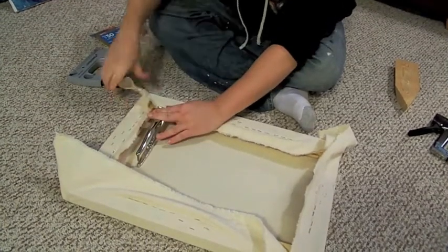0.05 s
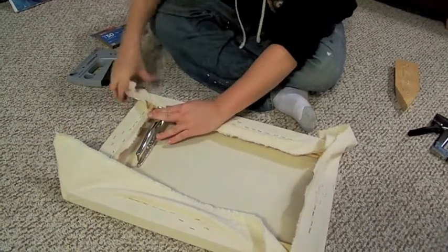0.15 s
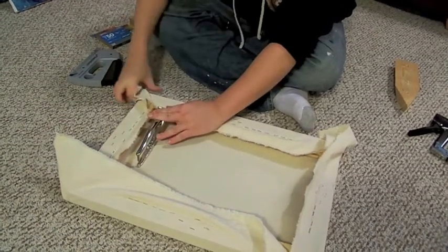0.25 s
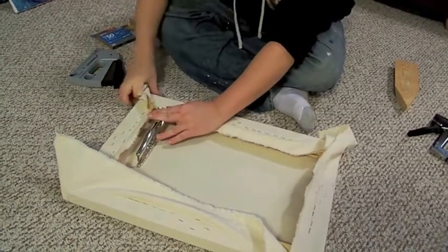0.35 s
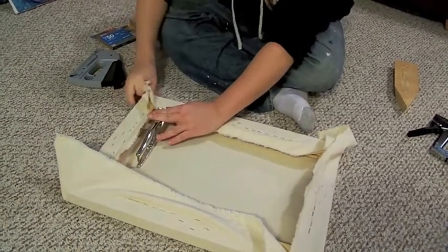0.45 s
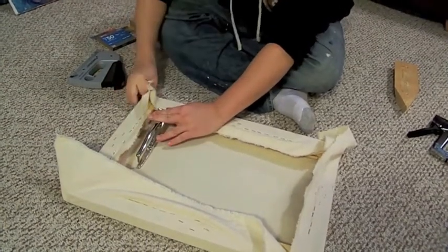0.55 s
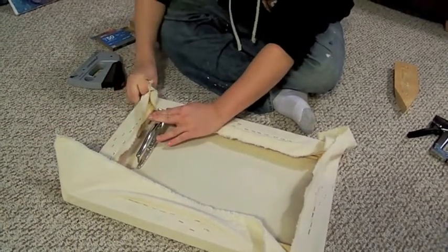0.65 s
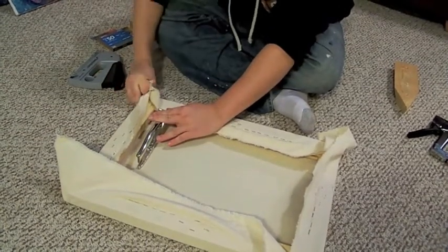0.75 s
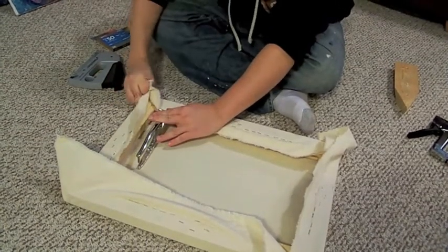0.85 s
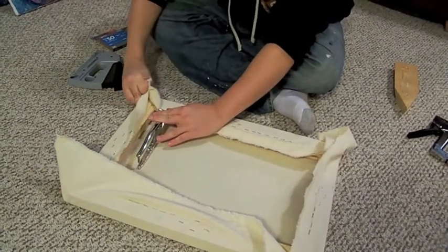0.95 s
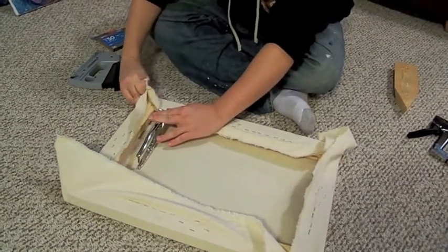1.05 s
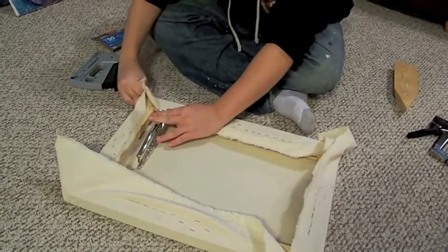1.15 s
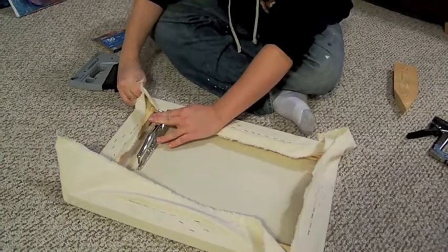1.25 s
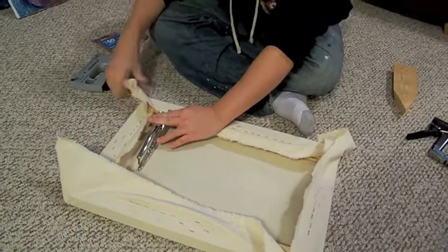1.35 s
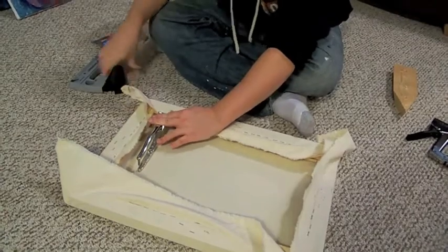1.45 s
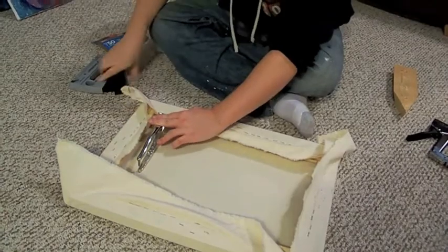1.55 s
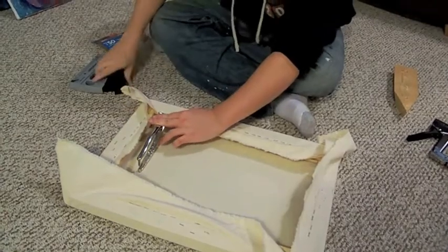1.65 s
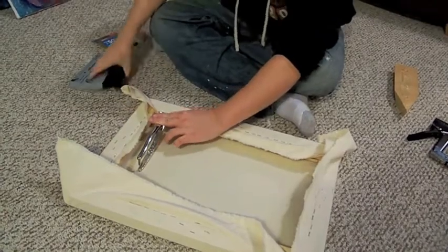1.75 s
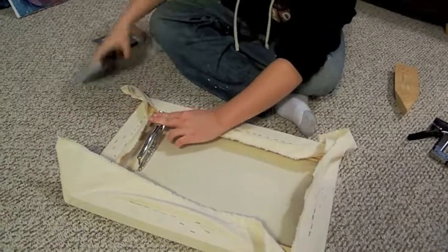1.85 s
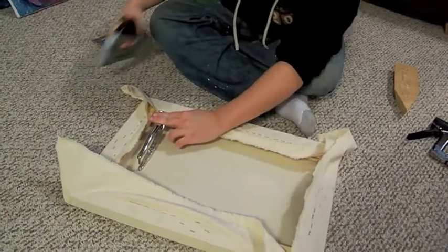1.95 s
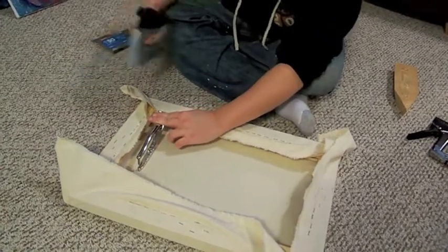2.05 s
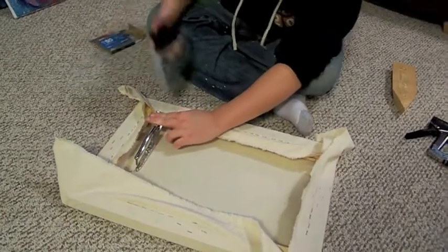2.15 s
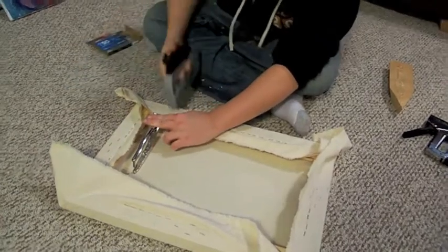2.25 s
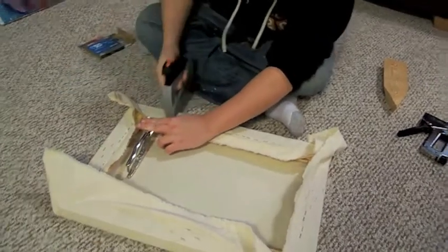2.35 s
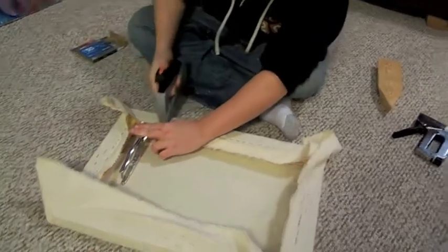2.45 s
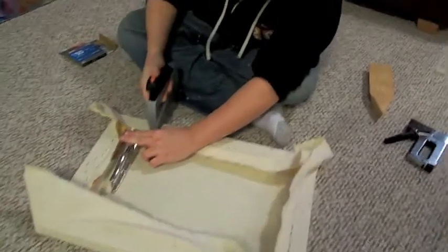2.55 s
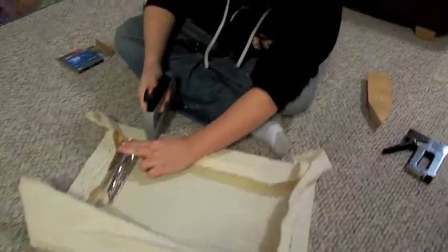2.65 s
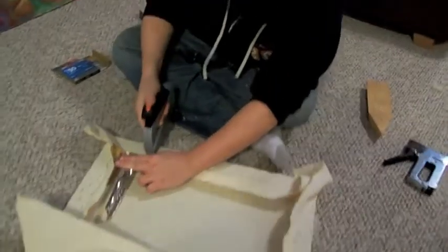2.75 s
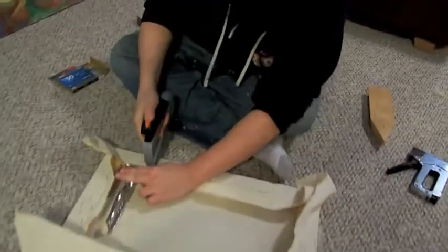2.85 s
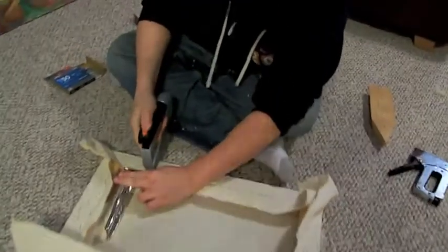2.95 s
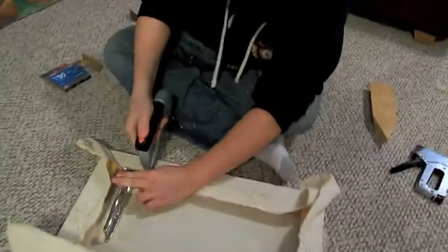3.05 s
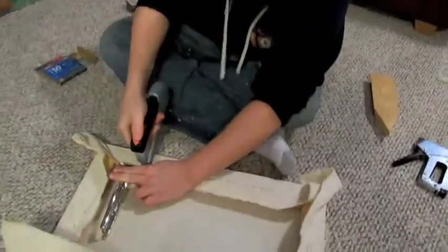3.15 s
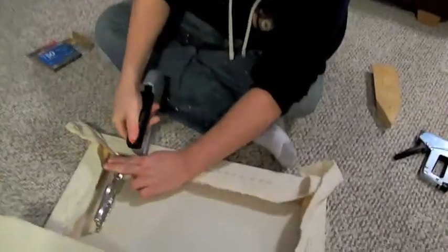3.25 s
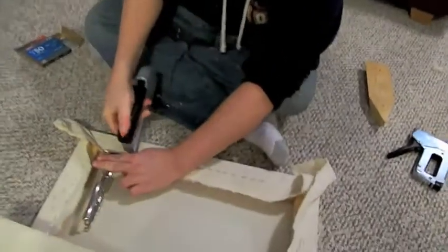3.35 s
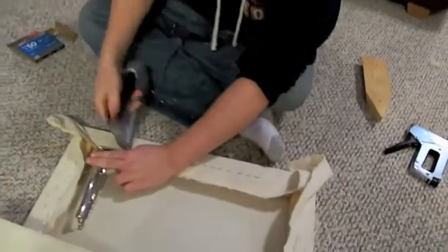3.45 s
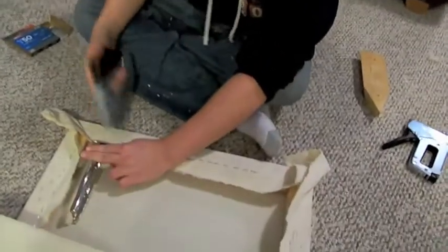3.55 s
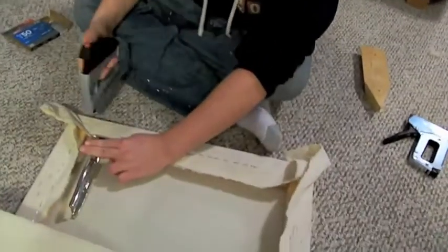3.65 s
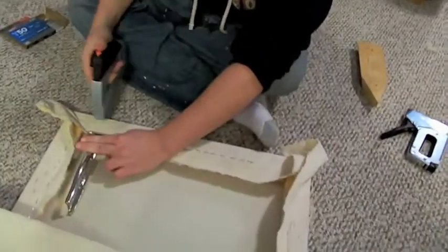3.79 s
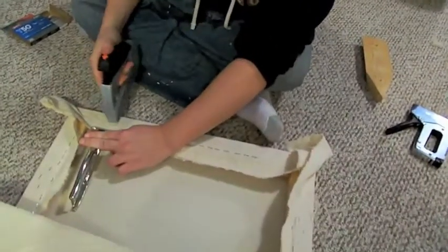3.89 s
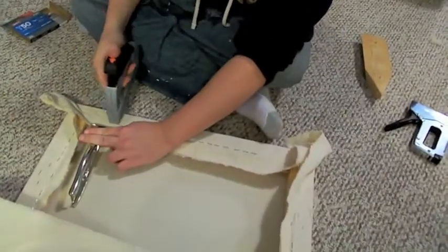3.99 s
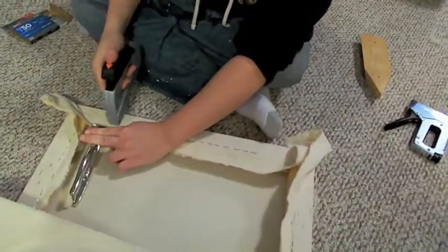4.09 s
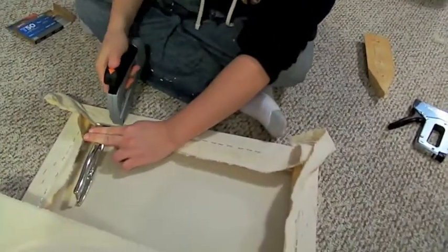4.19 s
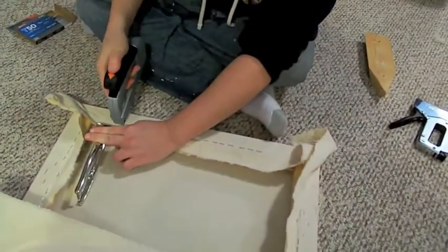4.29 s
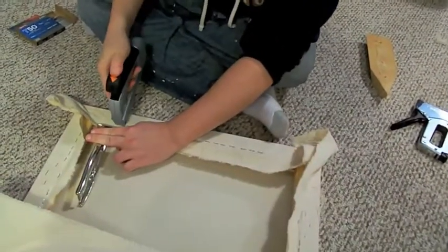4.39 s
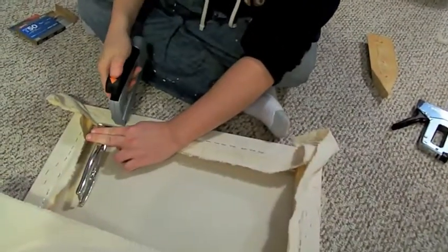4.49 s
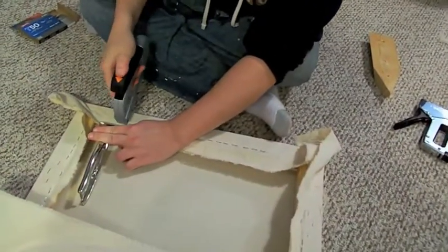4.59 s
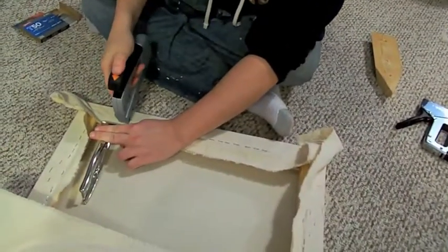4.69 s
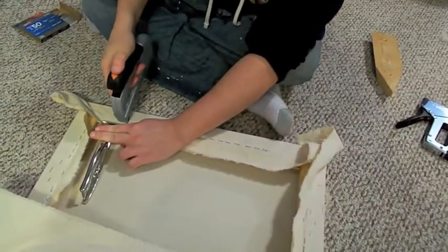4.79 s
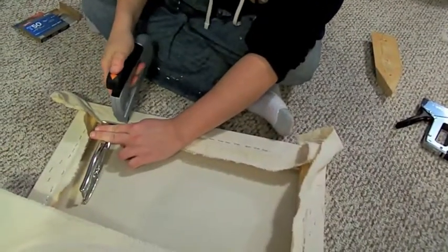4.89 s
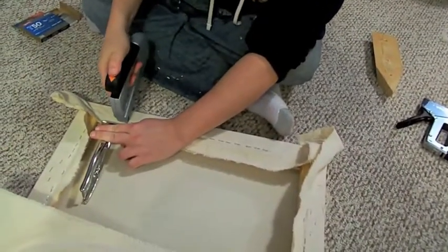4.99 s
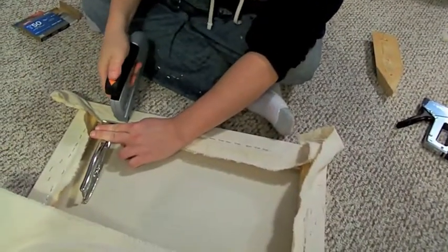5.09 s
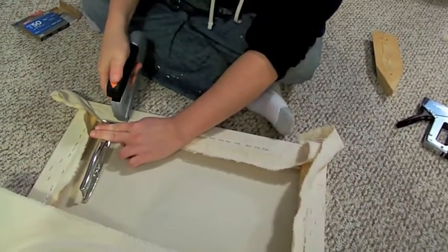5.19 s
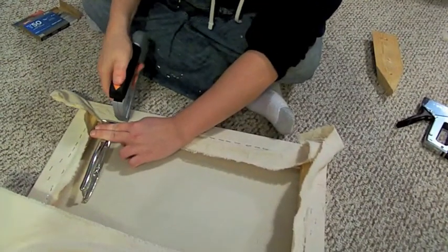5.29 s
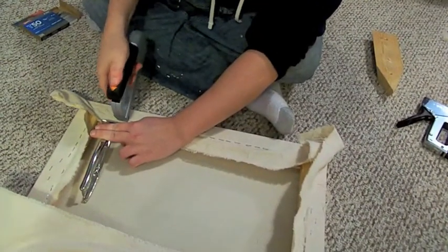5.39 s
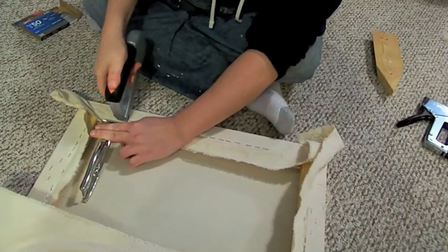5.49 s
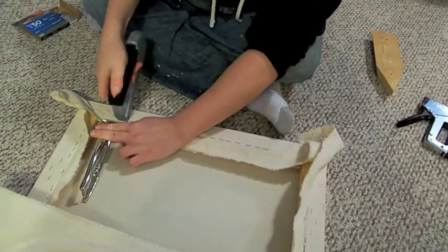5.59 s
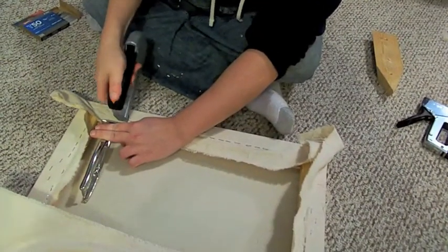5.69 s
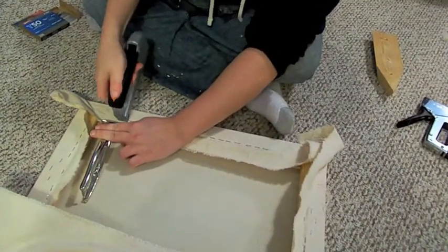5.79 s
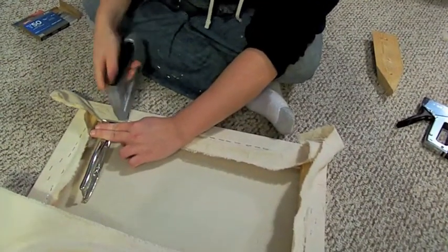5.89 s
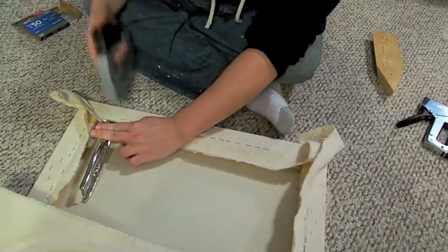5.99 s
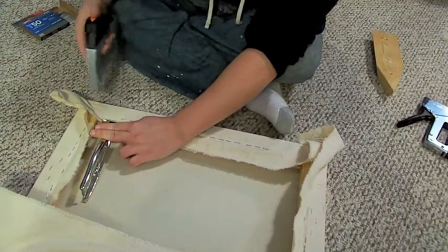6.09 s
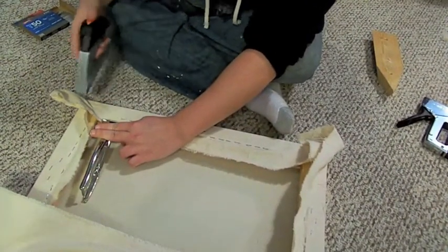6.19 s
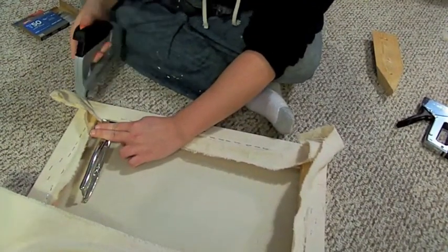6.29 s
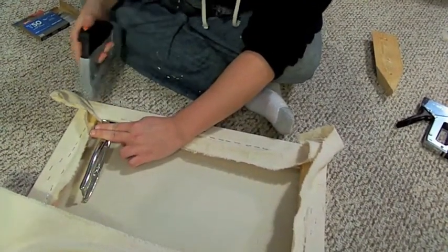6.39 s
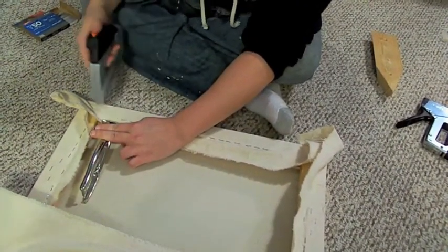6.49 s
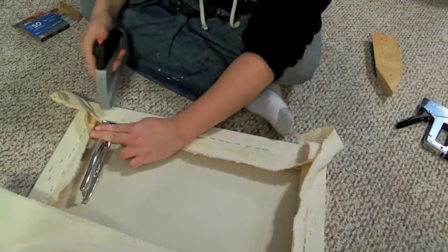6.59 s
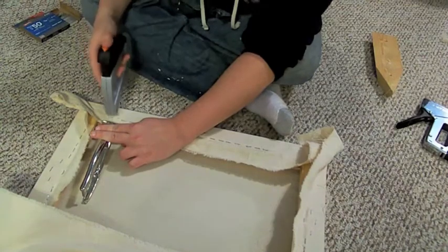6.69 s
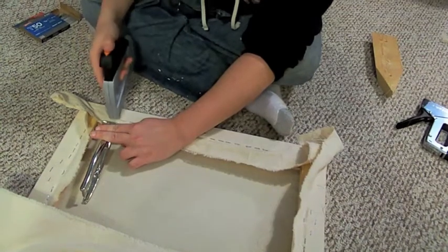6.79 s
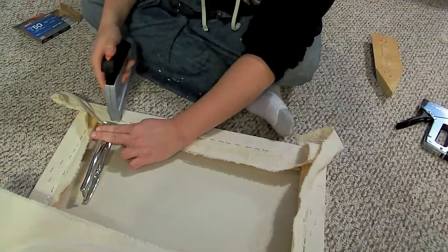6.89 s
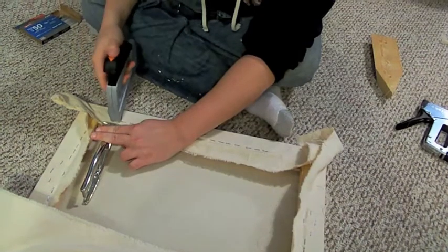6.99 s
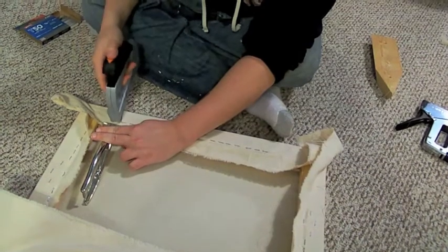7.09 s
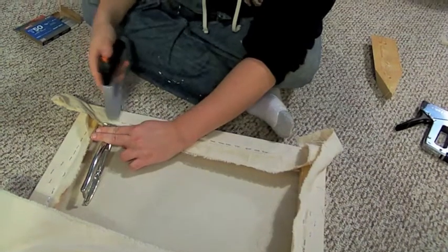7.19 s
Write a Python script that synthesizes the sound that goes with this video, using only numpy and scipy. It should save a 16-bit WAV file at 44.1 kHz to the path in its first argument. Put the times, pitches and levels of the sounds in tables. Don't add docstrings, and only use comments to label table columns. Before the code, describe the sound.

A hand staple gun works on a canvas-covered wooden frame, heard near a camera microphone. Quiet fabric movement and tiny metal ticks come first, then a bump of the gun, a hard dry snap and a rattling, briefly singing handle return. Low floor movement follows, then a light tap, another snap and clatter. Gain drops abruptly at each shot and creeps back; dull knocks end it.

```python
import sys
import numpy as np
from scipy import signal
from scipy.fft import rfft, irfft
from scipy.io import wavfile
from scipy.ndimage import uniform_filter1d

SR = 44100
rng = np.random.default_rng(int(sys.argv[2]) if len(sys.argv) > 2 else 0)


def voltage_ratio(level):
    return 10 ** (np.asarray(level, float) / 20)


def unload_wav(signal):
    wavfile.write(
        sys.argv[1],
        SR,
        np.round(np.clip(np.atleast_2d(signal).T, -1, 1) * 32767).astype(np.int16),
    )


N = 319328
T = np.arange(N) / SR

# (time [s], peak [dB], ring [Hz], deepest gain [dB], recovery [s])
SHOTS = [
    (3.2931, 2, 6000, -42, 0.21),
    (5.703, 0.2, 3207, -38.5, 0.2),
]
# (time [s], peak [dB], ring [Hz], left minus right [dB])
STAPLE_CLICKS = [(0.1716, -28, 4860, 0), (1.509, -38, 5000, 6), (1.5148, -29.5, 5360, -2.1),
                 (1.5335, -30, 5360, 4), (1.5514, -35.5, 2310, 2), (1.6073, -46, 3480, 4),
                 (1.8499, -28.5, 2270, 2), (1.8648, -38, 2160, 6), (2.134, -41, 5000, 3),
                 (2.8905, -22, 3790, 4.5), (3.1164, -22, 2900, 2.5), (3.119, -26.5, 4983, 4),
                 (3.3125, -22.5, 5900, 3), (3.483, -19.5, 6370, 1.6), (3.6449, -22.5, 4750, 0.6),
                 (4.0963, -45, 3360, 2), (5.7215, -18.5, 2750, 2.5), (5.7415, -28.5, 2750, 7),
                 (6.079, -30, 2022, 1)]
# (time [s], peak [dB], ring [Hz], left minus right [dB])
BUMPS = [(2.0143, -44, 2250, 2.1), (2.1054, -15.5, 3280, 5), (2.1278, -33, 2630, 4),
         (2.1625, -34.5, 2980, 3), (3.0734, -38, 4950, 5), (3.684, -30, 2410, -1.1),
         (5.477, -42, 2784, 2.5), (5.5379, -35, 4910, -1.5), (5.5706, -15, 3023, 2), (5.9107, -26, 3400, 7),
         (6.9273, -40.5, 2700, 0)]
# (time [s], peak [dB], ring [Hz], chatter [ms], left minus right [dB])
LATCH_AND_HANDLE = [(3.2856, -4, 2930, 2.45, 2.5), (3.5196, -6.5, 1930, .7, -1),
                    (3.5208, -0.4, 5810, 1.8, 1.3), (3.537, -11, 2640, 2.5, -3.5),
                    (3.542, -8, 5100, 4.4, -3), (3.547, -5.5, 2700, 1.1, 0), (3.5495, -7, 2400, 1.8, 2),
                    (5.698, -4, 2706, 1.6, 5.5), (5.9452, -10, 1995, .6, -5.5), (5.947, 0, 6700, 2, 9),
                    (5.962, -7.5, 5800, 1.6, -2.5), (5.970, -6.5, 3140, 2.9, 7), (5.976, -5, 4874, 1.8, 3),
                    (5.982, -14, 2130, 1.4, -3)]
# (time [s], peak [dB], low tone [Hz], high tone [Hz], high tone level [dB])
SINGING_TAPS = [(.171, -41.5, 1456, 2770, -1.1), (1.51, -31, 1500, 2250, -16), (1.535, -38, 2220, 3460, 2),
                (1.576, -52, 1490, 2300, 8), (1.594, -54, 1510, 2300, 8), (1.608, -48, 2310, 3450, 0),
                (1.866, -42, 1410, 2170, 11), (5.999, -22.5, 1545, 2200, 6), (6.038, -35, 1506, 2200, 2.5),
                (1.851, -30.5, 1384, 2210, 4), (2.014, -44.5, 1420, 2200, 6), (2.134, -36, 1420, 2250, 5.5),
                (3.55, -20, 1508, 2070, 6), (5.475, -42, 1510, 2750, 8.5), (5.974, -18, 1548, 2060, 8),
                (3.644, -32.5, 1480, 2200, 1.5), (5.57, -31, 1518, 2200, 1), (6.927, -43, 1465, 2674, 6.5)]
# (tone [Hz], width [Hz], level [dB])
CASING = [(1420, 330, -12.5), (2750, 1200, -11.5), (4300, 900, -14), (5460, 1200, -21.5)]
# (time [s], peak [dB], tone [Hz], fall by 60 dB [s], chatter [ms])
FRAME_KNOCKS = [(2.105, -17, 1190, 0.0056, 3.3), (2.105, -28.5, 241, 0.028, 7.4),
                (2.95, -46.5, 520, 0.013, 120), (3.2923, -27.5, 106, .04, 7.1), (3.293, -21, 520, 0.03, 4),
                (4.001, -44.5, 155, 0.048, 6.5), (5.7054, -31, 109.4, 0.02, 2.5),
                (3.117, -37.5, 700, .012, 2.5), (5.7055, -38.5, 54.8, .05, 2.6), (5.703, -22, 443, .02, 4),
                (5.898, -36, 259, 0.052, 21.5), (6.39, -45, 219.6, 0.048, 12), (6.933, -37, 110, 0.02, 6.3),
                (7.106, -46, 672, .02, 3.4), (7.113, -32.5, 500, 0.025, 5), (7.129, -43, 564, 0.025, 61),
                (7.21, -50, 583, 0.023, 9.7)]
# (tone [Hz], width [Hz])
BOARDS = [(38, 22), (78, 31)]
SHIVER_DB = [-58.5, -68.5]
# (time [s], peak [dB], tone [Hz], fall by 60 dB [s])
WEIGHT_SHIFTS = [(0.018, -50, 34, .8), (1.899, -52, 44.4, .5), (2.09, -39, 37.87, 1.1),
                 (2.1, -58, 78, 0.55), (3.13, -52.5, 80, .4), (3.668, -39, 76.4, 0.38),
                 (3.812, -47, 81.6, 0.41), (3.971, -52, 62.5, .4), (4.29, -34.5, 79.9, 0.35),
                 (4.31, -39, 41.55, 2.2), (4.44, -49.5, 74.1, 1.8), (4.78, -33.5, 21.57, 0.86),
                 (4.791, -39, 60.9, 0.79), (5.26, -49, 78.5, 0.99), (5.4, -47.5, 75, .5),
                 (5.861, -46.5, 71.8, 0.43), (5.92, -43, 39.95, 1.8), (6.049, -49.5, 71.6, 0.98),
                 (6.359, -41.5, 79.8, 0.47), (6.419, -50, 39.2, 0.82), (6.5, -54, 71, 0.52),
                 (6.721, -43.5, 34.5, 0.53), (6.919, -45.5, 69.5, .6), (6.95, -50, 35.1, 0.68),
                 (7.08, -42, 23.14, .9)]
# (loudest time [s], level [dB], swell [s], fade [s])
RUSTLES = [(.46, -57.5, 0.24, 0.2), (1.04, -58.5, 0.15, .08), (1.28, -56, 0.048, 0.11),
           (1.46, -69, 0.12, .1), (1.62, -55, 0.092, 0.075), (1.77, -56, 0.057, 0.22),
           (2.7, -65, 0.68, 0.58), (2.96, -62.5, .08, 0.079), (3.05, -61, 0.056, 0.053),
           (3.2, -55.5, 0.056, 0.07), (4.09, -62, .15, .1), (4.8, -60.5, .15, .25), (1.6, -65, 3.1, 4.1)]
# (frequency [Hz], level per Hz [dB])
CLOTH_COLOUR = [(500, -22), (1200, 2), (2500, 3.5), (4500, 2), (7000, -3)]
# (frequency [Hz], level per Hz [dB])
HUM_COLOUR = [(20, -3.5), (40, 4), (70, -1), (150, 1), (500, -4.5), (2500, -13.5), (5000, -16),
              (7500, -20.5)]
# (delay [ms], level [dB], smear [ms])
WALL_ECHOES = [(17.87, -10.5, 1), (26.8, -18, 4), (33.2, -31.5, 5)]
# (band [Hz], level [dB], fall by 60 dB [s])
ROOM_BANDS = [(143, -33, 0.46), (500, -35, .3), (1200, -25.5, 0.25), (2640, -22, 0.34), (4400, -24, 0.076),
              (7100, -25.5, 0.48)]
# (frequency [Hz], width [Hz], depth [0-1])
HOUSING_DIPS = [(297.5, 150, 0.89), (951, 50, 0.9)]

SQUEEZE_DB = -22


def unit(x):
    return x / np.sqrt(np.mean(x ** 2))


def crest(x, db):
    return voltage_ratio(db) * x / abs(x[:2].mean(0)).max()


def peak(x, hz, width):
    return signal.lfilter(*signal.iirpeak(hz, hz / width, SR), x)


def coloured(shape, points):
    hz, db = np.transpose(points)
    f = np.maximum(np.arange(shape[-1] // 2 + 1) * SR / shape[-1], 1)
    slope = voltage_ratio(np.interp(np.log(f), np.log(hz), db)) * (f > 15)
    return unit(irfft(rfft(rng.standard_normal(shape)) * slope, shape[-1]))


def pair(x, apart):
    return (x[0] + apart * x[1] * np.array([[1], [-1]])) / np.sqrt(1 + apart ** 2)


def walk(rate):
    hold = int(SR / rate)
    steps = np.repeat(rng.standard_normal(N // hold + 1), hold)
    return 1.6 * uniform_filter1d(steps, hold)[:N]


def facets(envelope, apart):
    noise = rng.standard_normal((4, len(envelope)))
    return np.vstack([pair(noise[:2], apart), noise[2:]]) * envelope


def add(out, s, x, pan_db):
    for ch, (lag, side) in enumerate(((2, 1), (0, -1), (0, 0), (0, 0))):
        i = int(s * SR) + lag
        piece = x[ch, :N - i]
        out[ch, i:i + len(piece)] += piece * voltage_ratio(side * pan_db / 2)


def gain_db(t):
    hold_s, fall_s = 0.004, 0.0015
    out = 0 * t
    for s, _, _, deep_db, back in SHOTS:
        age = t - s
        fall = np.clip((age - hold_s) / fall_s, 0, 1)
        rise = np.clip(1 - age / back, 0, 1) ** 0.92
        out = out + (age >= 0) * (SQUEEZE_DB + fall * (deep_db * rise - SQUEEZE_DB))
    return out


def hum():
    return voltage_ratio(-54.5 + 1.1 * walk(0.91)) * pair(coloured((2, N), HUM_COLOUR), 0.58)


def floor_boards():
    lean_s = 0.036
    out, age = np.zeros((4, N)), np.arange(SR) / SR
    for (hz, width), db in zip(BOARDS, SHIVER_DB):
        noise = pair(rng.standard_normal((2, N)), 1 / 4)
        shiver = peak(peak(noise, hz, width), hz, width)
        out[:2] += voltage_ratio(db) * unit(shiver)
    for s, db, hz, t60 in WEIGHT_SHIFTS:
        wander = np.cumsum(rng.standard_normal(SR)) * 4.3 / np.sqrt(SR) + np.array([[.25], [-.25]])
        arrival = 1 - np.exp(-(age / lean_s) ** 2)
        swing = np.sin(2 * np.pi * hz * age + wander) * arrival * voltage_ratio(-60 * age / t60)
        swing = np.vstack([swing, 0 * swing])
        add(out, s, crest(swing, db - gain_db(s)), 0.1)
    return out[:2]


def clack(hz, thud_db, envelope, ring_db):
    burst = facets(envelope, 0.26)
    bright = signal.sosfilt(signal.butter(2, [1900, 6900], "band", fs=SR, output="sos"), burst)
    ring = crest(peak(burst, hz, hz / 9), ring_db)
    ring = ring * np.array([[1], [1], [1 / 3], [1 / 3]])
    casing = sum(crest(peak(burst, f, width), db) for f, width, db in CASING)
    thud = crest(peak(burst, 820, 530), min(thud_db, -8))
    return crest(crest(bright, 0) + ring + casing, 0) + thud


def small_clacks(out):
    age = np.arange(4000) / SR
    hits = [(s, db, hz, -28.5, 2.3, pan_db) for s, db, hz, pan_db in STAPLE_CLICKS]
    hits += [(s, db, hz, -12.5, 1.5, pan_db) for s, db, hz, pan_db in BUMPS]
    for s, db, hz, ms, pan_db in LATCH_AND_HANDLE:
        thud_db = -18.5 - 8.5 * np.log2(hz / 2000)
        hits.append((s, db, hz, thud_db, ms, pan_db))
    for s, db, hz, thud_db, ms, pan_db in hits:
        u = age / (ms / 1000)
        envelope = np.sqrt(u) * np.exp(-u ** 1.05)
        add(out, s - .0004, voltage_ratio(db - gain_db(s)) * clack(hz, thud_db, envelope, -0.69), pan_db)


def singing_taps(out):
    age = np.arange(4000) / SR
    for s, db, low_hz, high_hz, high_db in SINGING_TAPS:
        rattle = np.cumsum(rng.standard_normal((2, len(age))), axis=1) * 13.0 / np.sqrt(SR)
        low = np.sin(2 * np.pi * low_hz * age + rattle[0])
        high = voltage_ratio(high_db - 6.5) * np.sin(2 * np.pi * high_hz * age + rattle[1])
        song = (low + high) * voltage_ratio(-60 * age / 0.045) * np.minimum(age / 0.0008, 1)
        add(out, s, voltage_ratio(db - gain_db(s)) * np.tile(song, (4, 1)), 3.0)


def driver_blows(out):
    age = np.arange(4000) / SR
    for s, db, hz, _, _ in SHOTS:
        shudder = voltage_ratio(-40 * np.maximum(age - 0.0033, 0) / 0.019)
        envelope = shudder * (1 + np.exp(-age / 0.00036) / 2)
        add(out, s, voltage_ratio(db + 5.0 - SQUEEZE_DB) * clack(hz, -22.5, envelope, 1.5), 1)


def gun():
    out = np.zeros((4, N))
    small_clacks(out)
    singing_taps(out)
    driver_blows(out)
    low = signal.sosfilt(signal.butter(2, 800, fs=SR, output="sos"), out[:2])
    out[:2] += .8 * (low.mean(0) - low)
    return out


def room(x):
    age = np.arange(int(.6 * SR)) / SR
    noise = rng.standard_normal((2, 3, 1, len(age)))
    tail = 0
    for hz, db, t60 in ROOM_BANDS:
        band = peak(pair(noise, min(hz / 3000, .85)), hz, hz) * voltage_ratio(-60 * age / t60)
        tail = tail + voltage_ratio(db) * band / np.sqrt(np.sum(band ** 2) / 2)
    tail = tail * np.minimum(age / 0.0037, 1) * 2
    for ms, db, smear in WALL_ECHOES:
        late = age - ms / 1000
        echo = rng.standard_normal(tail.shape) * (late >= 0) * np.exp(-abs(late) / (smear / 2000))
        tail = tail + voltage_ratio(db) * echo / np.sqrt(np.sum(echo ** 2) / 2)
    faces = np.vstack([x[:2].mean(0), x[2:]])[:, None]
    return signal.fftconvolve(faces, tail, axes=2).sum(0)[:, :N]


def cloth():
    level = 0
    for s, db, swell, fade in RUSTLES:
        level = level + voltage_ratio(db - 20 * np.maximum((s - T) / swell, (T - s) / fade))
    grain = voltage_ratio(2.0 * walk(90) + 0.5)
    return pair(coloured((2, N), CLOTH_COLOUR), 0.56) * level * grain


def frame():
    out, age = np.zeros((4, N)), np.arange(8000) / SR
    for s, db, hz, t60, ms in FRAME_KNOCKS:
        push = facets(np.exp(-age / (ms / 1000)), 0.2)
        ring = peak(push, hz, 2.2 / t60)
        add(out, s, crest(ring, db - gain_db(s + .003)), 0.3)
    return out


def scene():
    metal, wood = gun(), frame()
    echoes = room(metal + voltage_ratio(-9.0) * wood)
    return hum() + floor_boards() + metal[:2] + echoes + cloth() + wood[:2]


def band_limit(x):
    return signal.sosfilt(signal.butter(12, 16300, fs=SR, output="sos"), x)


def record(dry):
    x = dry
    for hz, width, depth in HOUSING_DIPS:
        x = x - depth * peak(x, hz, width)
    x = x * voltage_ratio(gain_db(T))
    x = 1.3 * np.tanh(x / 1.3)
    x = x - 0.62 * peak(x, 7600, 1600)
    x = signal.sosfilt(signal.cheby2(12, 52, 1.1725 * 7200, fs=SR, output="sos"), x)
    x = np.clip(x, -.88, .88)
    x = signal.sosfilt(signal.cheby2(10, 60, 16300, fs=SR, output="sos"), x)
    return band_limit(x)


dry = scene()
out = record(dry)
unload_wav(out)
```